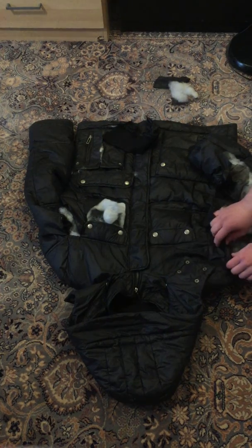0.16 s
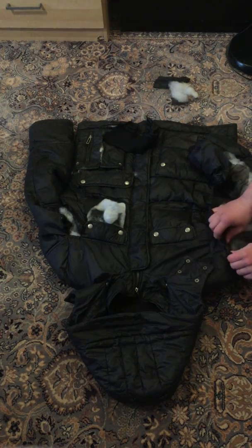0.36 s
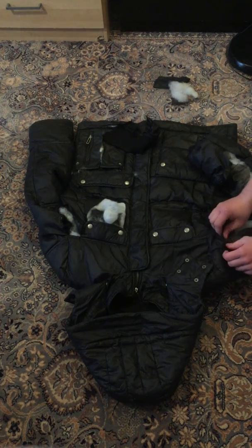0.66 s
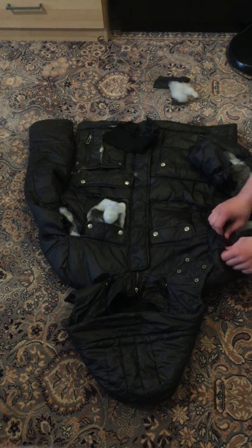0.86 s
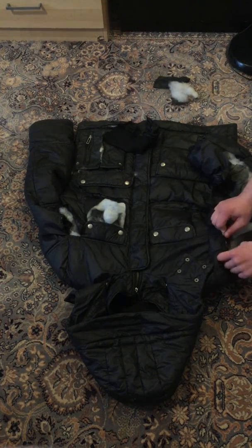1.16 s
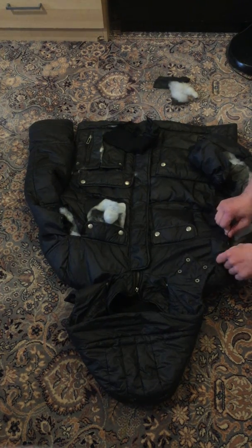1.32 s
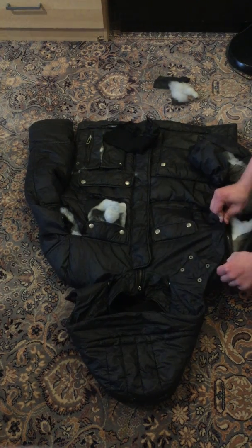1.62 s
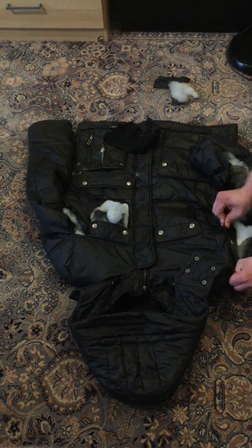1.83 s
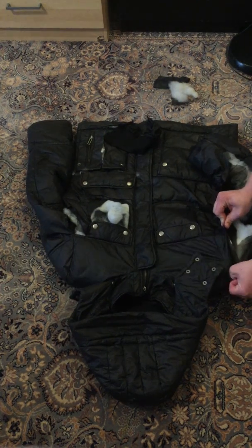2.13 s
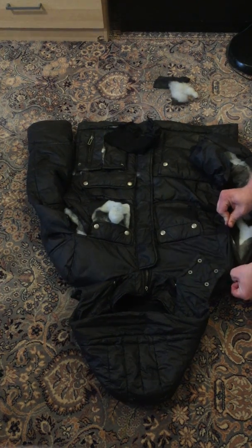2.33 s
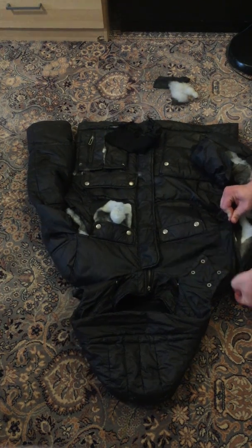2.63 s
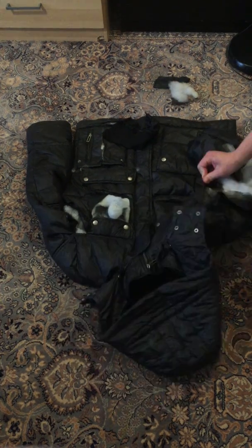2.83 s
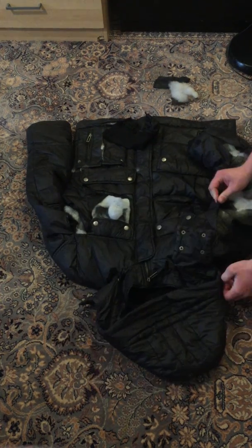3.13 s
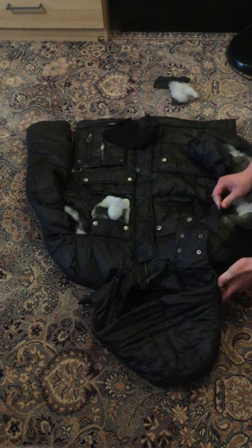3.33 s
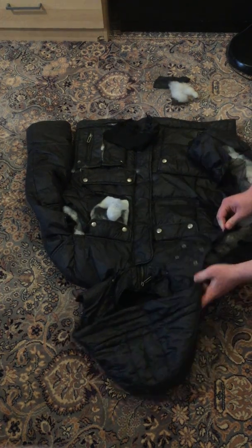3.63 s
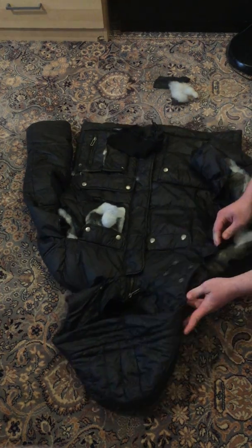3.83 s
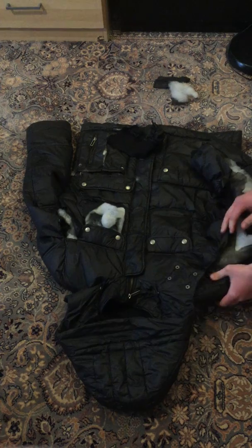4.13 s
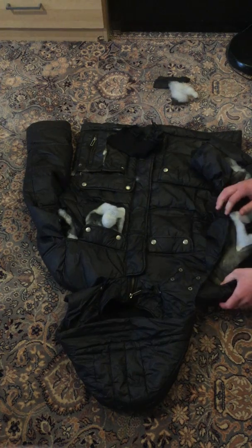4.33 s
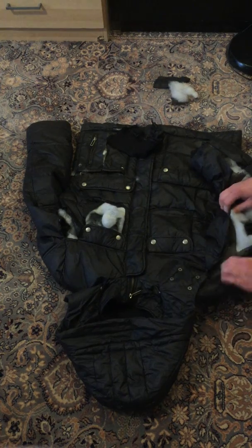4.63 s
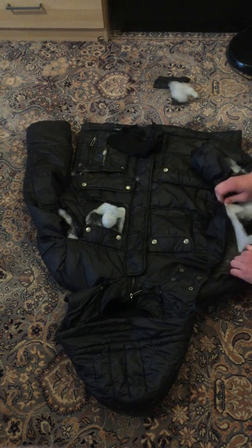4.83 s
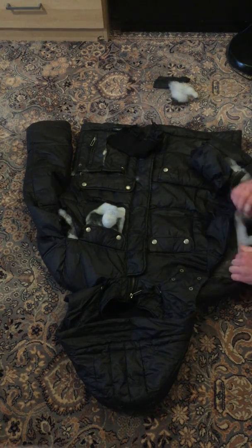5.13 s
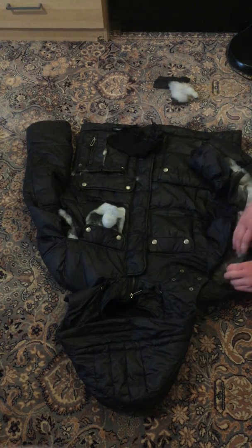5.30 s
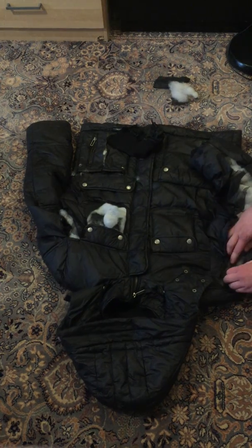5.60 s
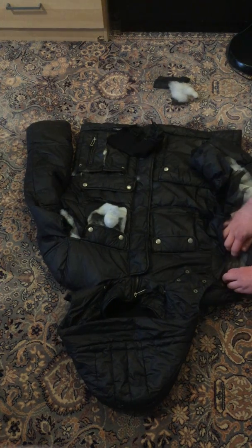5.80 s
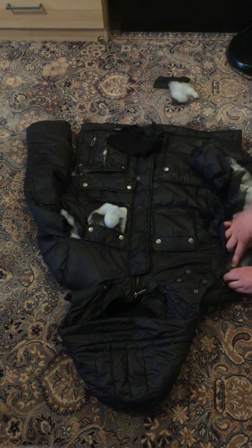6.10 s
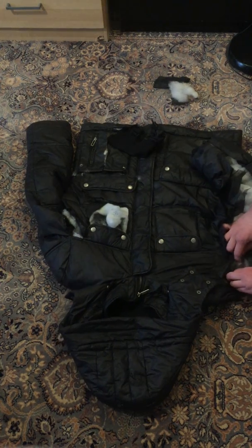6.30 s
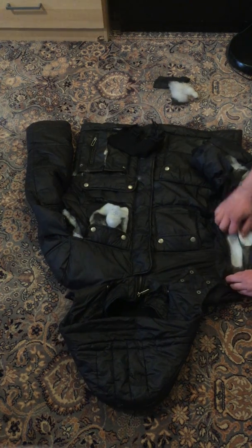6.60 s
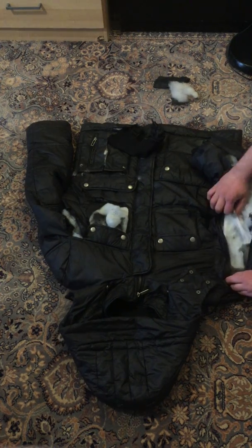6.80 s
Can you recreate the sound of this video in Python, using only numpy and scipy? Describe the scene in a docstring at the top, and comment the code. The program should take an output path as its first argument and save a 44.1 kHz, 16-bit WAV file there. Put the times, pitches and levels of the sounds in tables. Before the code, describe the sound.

After faint fumbling, jacket fabric tears loudly with snapping threads and dull padded thumps, followed by soft rustling in a quiet carpeted room.

```python
"""Hands tear the nylon shell of a quilted jacket on a carpet: threads snap singly or in dense rips.
Snaps and rips are noise bursts; jolted padded panels ring in two damped modes with a crinkle.
Between pulls, grainy noise gives fingers sliding, cloth dragging and padding shifting.
A metal fitting tinkles, low noise bumps through the floor, and a quiet room adds echoes and hiss."""
import sys
import numpy as np
from scipy import signal
from scipy.fft import rfft, irfft, next_fast_len
from scipy.io import wavfile
from scipy.ndimage import uniform_filter1d

SR = 44100
rng = np.random.default_rng(int(sys.argv[2]) if len(sys.argv) > 2 else 0)


def put_to_file(sound):
    """Save the sound as 16-bit audio at rate SR, in the file named by the first command-line argument."""
    columns = np.atleast_2d(sound).T  # one column per channel
    safe = np.clip(columns, -1, 1)
    whole_steps = np.round(safe * 32767)
    wavfile.write(sys.argv[1], SR, whole_steps.astype(np.int16))


N = 306495

# single threads breaking, loud ones and quiet isolated ones, each at a set time:
# (time [s], thread peak [dB], brightness [dB], panel crack re thread [dB])
THREAD_SNAPS = [(1.5246, -15.5, -4, -11.5), (1.5404, -22, 2, -28), (1.5842, -19, -4, -5.5),
                (1.6159, -16, 8, -3), (1.7276, -29, -14, 2), (1.7391, -35, 2, 9.5), (1.7449, -34.5, 3, 8),
                (1.7546, -25, 0, -15), (1.7623, -38, 1, -8), (1.769, -30, -11, -2), (1.8071, -36, 0, -10),
                (1.8156, -27, -4, -14), (1.8243, -27, 0, -19), (1.8284, -23, 0, -5), (1.8342, -20, 4, -11),
                (1.839, -24.5, 9, 0.5), (1.8446, -27, 2, -7), (1.85, -30, 7, -8), (1.8573, -27, 3, -6),
                (1.8752, -18, 4, -11), (1.8882, -24, -2, -9), (1.9041, -24.5, 0, -8.5),
                (1.9257, -23.5, 17, -7), (1.9406, -21, 21, -9), (1.9656, -27, 18, -21),
                (1.969, -25.5, 5, -4.5), (1.9923, -39, 2, -10), (2.0083, -38, -4, -18),
                (2.0305, -42, -2, -23), (2.0359, -33.5, -1, -14), (2.0424, -33, -2, -18),
                (2.1188, -20.5, -9, -11.5), (2.192, -39, -16, -18), (2.195, -33, -4, -11),
                (2.1995, -41, -11, -10), (2.2058, -31.5, -9, -21), (2.2083, -32, -14, -17),
                (2.239, -46, -5, -6), (2.2782, -39, 0, -24), (2.2826, -44, 3, -3), (2.2898, -14, -7, -23.5),
                (2.3692, -47, 5, -17), (2.373, -41.5, 9, -21), (2.442, -41, 3, -16), (2.4502, -40, -4, -14),
                (2.4545, -37, -6, -13), (2.4721, -33, -9, -21), (2.4765, -18, -5, -35),
                (2.4784, -20, -1, -18), (2.4828, -18.5, 1, -25), (2.488, -29, -7, -7),
                (2.4915, -25, -1, -14), (2.5391, -44, 8, -14), (2.7031, -34.5, -9, -4),
                (2.7072, -31, -6, -15), (2.709, -20, -10, -24), (2.712, -19.5, -4, -3),
                (2.7212, -14.5, -3, -30), (2.7252, -17.5, -5, -6), (2.7346, -25, 9, 0),
                (2.7488, -22, 9, -11), (6.4112, -44, 5, 1.5), (6.6026, -47, -6, -16), (6.65, -51, 0, 10.5),
                (6.6895, -51.5, 0, 10), (6.793, -58, 0, 8)]
# further threads giving way at random moments as the seam frays:
# (start [s], length [s], mid-range peak [dB])
FRAYING_SPANS = [(1.73, 0.076, -41), (1.805, 0.095, -31), (1.9, .08, -37), (2.028, 0.018, -42.5)]
FRAY_PER_S, FRAY_RANGE_DB = 70, 9  # range is plus or minus
FRAY_BRIGHT_DB, FRAY_CRACK_DB = -1, -11.5
# runs of dense tearing, each a curve: (time [s], threads [dB], panel [dB], padding [dB])
RIP_CURVES = [
    [(1.523, -56, -63, -66), (1.54, -38, -43.5, -64), (1.575, -35, -44, -54), (1.59, -35, -32, -49),
     (1.62, -30, -32.5, -33.5), (1.645, -34.5, -29, -51), (1.68, -45.5, -41.5, -53), (1.72, -53, -46, -63)],
    [(1.725, -48, -50, -57), (1.765, -56, -37.5, -54), (1.8, -53, -44, -65), (1.83, -46, -43, -44),
     (1.86, -56, -51, -56), (1.88, -41.5, -43.5, -55.5), (1.92, -62, -50, -56.5), (1.97, -53, -47.5, -57),
     (2.02, -63, -64, -63), (2.06, -52, -62, -61)],
    [(2.474, -49.5, -44, -44), (2.505, -50.5, -54.5, -54.5), (2.54, -54.5, -72, -65),
     (2.575, -74, -82, -78)],
    [(2.707, -54, -56, -55), (2.718, -48, -37, -42), (2.73, -32, -34, -38.5), (2.755, -38, -38.5, -49),
     (2.775, -38.5, -41, -34), (2.79, -59, -41, -54), (2.82, -53.5, -62, -50)],
]
# padded panel jolted:
# (time [s], low mode [dB], tautness [pitch factor], high mode re low [dB], crinkle re low [dB])
PANEL_JOLTS = [(1.524, -43, 1, -12, 5), (1.583, -35.5, 0.97, 10, 1), (1.6142, -23.5, 0.88, 7.5, -5),
               (1.847, -37.5, 1.06, -1, -6), (1.876, -32, 0.93, -19, -7), (1.941, -34, 1.03, -17, -12),
               (1.97, -30, 1.04, -12, -20), (2.036, -46.5, 1, -13, -10), (2.118, -39, 1.02, -8, -21),
               (2.29, -32.5, 0.98, 8.5, -4), (2.477, -38.5, 0.91, 12.5, -15), (2.712, -35.5, 0.93, 6, 1),
               (2.722, -24.5, 0.9, 2.5, 3.5), (2.769, -26.5, 0.74, -12, -18), (3.043, -48, 0.94, -13, -14),
               (3.645, -54, 1.02, 6, 1), (4.887, -64, 0.95, 0, 10.5), (4.92, -67, 1, 4, 9),
               (6.365, -48.5, 1.07, -18, -15), (6.4096, -30, 0.95, -17, -9.5), (6.446, -42, 0.66, -11, -24),
               (6.568, -58, 0.85, 1, 1), (6.603, -49.5, 0.82, -12, -5), (6.651, -42, 1.02, 5.5, -7),
               (6.689, -42, 1.08, 6, -2), (6.79, -48, 1.08, 13, -4)]
# low and high mode of a padded panel: (frequency [Hz], t60 [s])
PANEL_MODES = [(350, 0.03), (635, 0.015)]
# hand moves: (peak [s], rise [s], fall [s], fingers sliding [dB], sheen re sliding [dB],
#              cloth dragging [dB], padding shifting [dB])
HAND_STROKES = [(0.0, .01, 0.036, -69, -14, -63, -61), (.212, 0.15, 0.12, -71, -3, -68.5, -79),
                (.284, 0.069, .05, -80, -5, -76, -63), (.354, 0.067, 0.13, -72.5, -9, -73, -77),
                (.538, .05, 0.068, -68, -6, -71.5, -78), (.93, .025, 0.063, -78, 0, -78, -75),
                (1.08, .06, 0.048, -70.5, 6, -71.5, -75), (1.25, 0.09, .04, -70.5, 4, -73.5, -79),
                (1.31, .015, .12, -69.5, -4, -68.5, -74), (1.43, .05, 0.12, -75, -4, -76, -82),
                (1.501, 0.044, 0.02, -66, -2, -67, -94), (2.8, 0.0088, 0.094, -51, -7, -45, -48),
                (2.93, 0.077, 0.077, -75, -4, -59.5, -61), (3.034, 0.025, 0.082, -73, -4, -59, -62),
                (3.16, 0.057, 0.13, -68.5, -4, -64.5, -85), (3.26, .1, 0.043, -69.5, 0, -69, -75),
                (3.4, 0.17, .2, -81, -8, -67, -82), (3.65, .17, 0.2, -70, -4, -62.5, -68),
                (3.81, 0.082, 0.16, -67.5, -2, -54.5, -63), (3.91, .12, 0.1, -68.5, -4, -55, -64.5),
                (4.03, .06, 0.077, -76, -5, -69.5, -70), (4.21, 0.12, .05, -72.5, 5, -72, -77),
                (4.25, 0.039, 0.21, -78, -1, -68, -68.5), (4.45, 0.26, 0.074, -71.5, -3, -72.5, -76),
                (4.66, 0.11, .15, -69, 0, -76, -77.5), (4.8, 0.25, 0.13, -66.5, 3, -68, -77),
                (4.9, 0.1, 0.13, -74, 0, -68.5, -73), (5.05, .05, 0.06, -73, -7, -86, -76),
                (5.125, 0.041, 0.027, -64.5, -15, -73, -79), (5.27, 0.071, 0.21, -73.5, 2, -76.5, -90),
                (5.45, 0.11, 0.13, -77.5, -5, -75.5, -78), (5.75, 0.21, .09, -76, -3, -67.5, -72),
                (5.86, 0.081, .13, -68.5, -10, -69, -70.5), (6.04, .04, 0.074, -77, -19, -76, -72),
                (6.25, 0.28, 0.14, -82, 2, -76, -76), (6.395, 0.094, 0.042, -74, 0, -65, -62),
                (6.43, 0.011, 0.024, -76, -5, -66, -56.5), (6.47, .03, 0.059, -73, 4, -76, -79),
                (6.569, 0.0044, .04, -65, 1, -61, -70), (6.62, 0.055, 0.072, -60.5, -1, -63.5, -72),
                (6.73, 0.11, 0.15, -54, -2.5, -54.5, -56.5), (6.81, 0.062, 0.034, -61, 0, -61, -59.5),
                (6.93, .06, 0.07, -77, -0.5, -76, -89)]
EDGE_DB, ROUNDNESS = -15.5, 1.41  # a swell is EDGE_DB down one rise before and one fall after its peak
# metal fitting struck: (time [s], level [dB])
FITTING_TINKS = [(2.955, -64), (3.02, -63)]
# modes of the fitting: (frequency [Hz], level [dB], t60 [s])
FITTING_MODES = [(10030, 0, 0.085), (15700, 0, .06)]
# dull bump through the floor, upper band then deep band twice: (peak [s], rise [s], fall [s], level [dB])
BUMP_SWELLS = [(.62, 0.045, 0.14, -46), (.675, 0.11, 0.065, -50.5), (.8, 0.045, .05, -57.5)]
# upper and deep spectrum of the bump: (frequency [Hz], density [dB per Hz])
BUMP_SPECTRA = [
    [(90, -15), (150, 4.5), (290, -0.5), (340, -15), (900, -48)],
    [(30, -17), (50, 7), (110, 7), (170, -25), (400, -58)],
]

# spectrum of a snapping thread: (frequency [Hz], density [dB per Hz])
THREAD_SPECTRUM = [(1800, -14), (2800, -8.5), (4000, -2), (6000, 1), (8000, -0.5), (10500, 0.5),
                   (14000, -3.5), (17500, -2)]
# spectrum of threads in a dense rip: (frequency [Hz], density [dB per Hz])
TEAR_SPECTRUM = [(2500, -11.5), (4000, -8), (6000, 2), (8000, -9.5), (10500, -1.5), (14000, -8),
                 (17500, -0.5)]
# spectrum of the cracking panel: (frequency [Hz], density [dB per Hz])
PANEL_SPECTRUM = [(200, -38), (600, -4.5), (1000, -8.5), (1700, 1), (2500, 0), (3500, -5), (6000, -10.5)]
# spectrum of the filling: (frequency [Hz], density [dB per Hz])
PADDING_SPECTRUM = [(70, -30), (130, -6), (250, -1.5), (350, 1.5), (450, -4), (630, 0.5), (900, -5.5),
                    (1400, -31)]
# spectrum of the crinkling shell: (frequency [Hz], density [dB per Hz])
CRINKLE_SPECTRUM = [(400, -30), (800, -4), (1800, 7.5), (3000, -9), (5000, -6)]
# spectrum of fingers on nylon: (frequency [Hz], density [dB per Hz])
SLIDE_SPECTRUM = [(1500, -26), (4000, 5), (6500, 6.5), (10000, -1), (12500, -6)]
# top treble of that friction: (frequency [Hz], density [dB per Hz])
SHEEN_SPECTRUM = [(8000, -20.5), (11000, -2), (14000, -9), (17500, -3)]
# spectrum of cloth on carpet: (frequency [Hz], density [dB per Hz])
DRAG_SPECTRUM = [(500, -3), (900, -2), (1800, 4.5), (2600, 0.5), (4000, -6.5), (7000, -31)]
# a small panel moves no deep bass: (frequency [Hz], gain [dB])
NO_BASS_GAIN = [(40, -25), (95, -0.5)]

# nearby surfaces: (delay [s], level [dB])
ROOM_ECHOES = [(.0066, -10), (0.0114, -16.5), (0.0224, -19)]
# decay of the diffuse tail: (frequency [Hz], t60 [s])
ROOM_T60 = [(200, 0.44), (600, 0.35), (1500, 0.34), (4000, 0.31), (10000, 0.16), (16000, 0.18)]
# what a reflection keeps: (frequency [Hz], gain [dB])
WALL_GAIN = [(300, -8.5), (1000, 1.5), (6500, -1), (8000, -3.5), (16000, -4)]
ROOM_DB = -7.5
# spectrum of air and microphone hiss: (frequency [Hz], density [dB per Hz])
HISS_SPECTRUM = [(34, -18), (46, 8.5), (60, -5.5), (78, -4), (90, 4), (105, -2.5), (180, -10), (270, -7.5),
                 (430, -11), (1080, -15.5), (2300, -15.5), (6000, -20.5), (10300, -23.5), (17000, -28.5)]
HISS_DB = -68
# dip of the microphone housing: (frequency [Hz], gain [dB])
MIC_GAIN = [(9700, 0), (10600, -7), (11500, 0)]
BASS_CUT_HZ, EDGE_HZ = 38, 17250


def snaps():
    """A break is a spike in a millisecond burst: thread in the treble, panel cracking below."""
    rows = THREAD_SNAPS + frayed()
    out, t = np.zeros(N), np.arange(-120, 400) / SR
    shape = np.where(t < 0, np.exp(t / 0.0003), np.exp(-t / 0.00045))
    noises = rng.standard_normal((len(rows), 2, len(t)))
    for (s, db, bright_db, crack_db), (thread_noise, crack_noise) in zip(rows, noises):
        tilt = [(6000, -bright_db * 0.6), (12000, bright_db * 0.6)]
        spike = 3.3 * np.sign(thread_noise) * (t == 0)
        thread = colour(colour(thread_noise * shape + spike, THREAD_SPECTRUM), tilt)
        # the smaller exponent lengthens the crack
        crack = colour(crack_noise * shape ** 0.34 + spike, PANEL_SPECTRUM)
        add(out, s + t[0], amp(db) * (unit_peak(thread) + amp(crack_db) * unit_peak(crack)))
    return out


def frayed():
    """Thread breaks at random moments in each fraying span, as rows like THREAD_SNAPS."""
    rows = []
    for start_s, length_s, mid_db in FRAYING_SPANS:
        count = int(FRAY_PER_S * length_s) + 1
        for when, level, bright, crack in rng.random((count, 4)):
            rows.append((start_s + length_s * when,
                         mid_db + FRAY_RANGE_DB * (2 * level - 1),
                         FRAY_BRIGHT_DB + 12 * (bright - 0.5),
                         FRAY_CRACK_DB + 12 * (crack - 0.5)))
    return rows


def rips():
    """Thousands of thread breaks a second shake the panel and the padding under it."""
    out = np.zeros(N)
    for rows in RIP_CURVES:
        s, (thread_db, panel_db, padding_db) = columns(rows)
        per_s = 3500 * amp(0.3 * (thread_db + 49.5))  # a harder pull breaks more threads
        breaks = grains(per_s, spread_db=2.0, grain_s=0.00029)
        slack = grains(0.4 * per_s, spread_db=7.0, grain_s=0.0026)
        sound = amp(thread_db) * evened(colour(breaks, TEAR_SPECTRUM))
        sound += amp(panel_db) * evened(colour(breaks, PANEL_SPECTRUM))
        sound += amp(padding_db) * evened(colour(slack, PADDING_SPECTRUM))
        add(out, s, sound * signal.windows.tukey(len(sound), 0.04))
    return out


def jolts():
    """Two heavily damped low modes with a soft start, and a crinkle of the shell dying with them."""
    out, t = np.zeros(N), np.arange(4000) / SR
    (low_hz, low_t60_s), (high_hz, high_t60_s) = PANEL_MODES
    soft_start = 1 - np.exp(-t / 0.00077)
    noises = rng.standard_normal((len(PANEL_JOLTS), len(t)))
    for (s, db, taut, high_db, crinkle_db), noise in zip(PANEL_JOLTS, noises):
        ring = amp(-60 * t / low_t60_s) * np.sin(2 * np.pi * low_hz * taut * t)
        ring += amp(high_db - 60 * t / high_t60_s) * np.sin(2 * np.pi * high_hz * taut * t)
        ring += amp(crinkle_db - 60 * t / 0.034) * evened(colour(noise, CRINKLE_SPECTRUM))
        add(out, s, amp(db) * soft_start * ring)
    return out


def handling():
    """Fine friction hiss of fingertips, coarser scuff of cloth, soft shifting of the filling."""
    frames_s = np.arange(0, N + 64, 64) / SR
    power = np.zeros((4, len(frames_s)))
    for s, rise_s, fall_s, slide_db, sheen_db, drag_db, padding_db in HAND_STROKES:
        peaks_db = [slide_db, slide_db + sheen_db, drag_db, padding_db]
        power += amp(np.add.outer(peaks_db, swell(frames_s, s, rise_s, fall_s))) ** 2
    gains = [np.interp(np.arange(N) / SR, frames_s, np.sqrt(p)) for p in power]
    steady = np.ones(N)
    rub = grains(7000 * steady, spread_db=-4.0, grain_s=0.0013)
    scuff = grains(1000 * steady, spread_db=3.0, grain_s=0.0019)
    shift = grains(600 * steady, spread_db=-0.5, grain_s=0.006)
    layers = [colour(rub, SLIDE_SPECTRUM), colour(rub, SHEEN_SPECTRUM),
              colour(scuff, DRAG_SPECTRUM), colour(shift, PADDING_SPECTRUM)]
    return sum(gain * evened(layer) for gain, layer in zip(gains, layers))


def tinks():
    """Two high decaying modes of a small piece of metal."""
    out, t = np.zeros(N), np.arange(6000) / SR
    ring = sum(amp(db - 60 * t / t60_s) * np.sin(2 * np.pi * hz * t) for hz, db, t60_s in FITTING_MODES)
    for s, db in FITTING_TINKS:
        add(out, s, amp(db) * ring)
    return out


def bump():
    """Low noise in two bands; the deeper one comes later and rolls once more."""
    out, t = np.zeros(N), np.arange(N) / SR
    upper, deep = BUMP_SPECTRA
    for (s, rise_s, fall_s, db), band in zip(BUMP_SWELLS, [upper, deep, deep]):
        noise = evened(colour(rng.standard_normal(N), band))
        out += amp(db + swell(t, s, rise_s, fall_s)) * noise
    return out


def room(x):
    """A few single echoes, and a diffuse tail in which each band dies at its own speed."""
    hz, t, z = signal.stft(rng.standard_normal(SR // 2), SR, nperseg=256)
    decay = amp(-60 * t / read(ROOM_T60, hz)[:, None])
    tail = signal.istft(z * decay, SR, nperseg=256)[1]
    tail = tail * np.clip((np.arange(len(tail)) / SR - 0.0015) / 0.0031, 0, 1)
    tail = amp(ROOM_DB) * tail / np.linalg.norm(tail)
    # soft surfaces spread each echo, from 1 ms ahead of its delay
    smear = rng.standard_normal((len(ROOM_ECHOES), 130)) * np.hanning(130)
    for (s, db), patch in zip(ROOM_ECHOES, smear):
        add(tail, s - 0.001, amp(db) * patch / np.linalg.norm(patch))
    return signal.fftconvolve(colour(x, WALL_GAIN), tail)[:N]


def hiss():
    """Steady coloured noise of air and microphone."""
    return amp(HISS_DB) * evened(colour(rng.standard_normal(N), HISS_SPECTRUM))


def grains(per_s, spread_db, grain_s):
    """Noise chopped into decaying bursts at random moments; sizes spread exponentially in dB."""
    size = amp(spread_db * np.minimum(rng.exponential(1, len(per_s)), 4))
    starts = size * (rng.random(len(per_s)) < per_s / SR)
    burst = np.exp(-np.arange(600) / (SR * grain_s))
    x = rng.standard_normal(len(per_s)) * signal.oaconvolve(starts, burst)[:len(per_s)]
    return x / np.sqrt(per_s / per_s.mean())  # density leaves the level alone


def swell(t, s, rise_s, fall_s):
    """Level in dB of a rounded rise and fall around second s."""
    return EDGE_DB * np.where(t < s, (s - t) / rise_s, (t - s) / fall_s) ** ROUNDNESS


def amp(db):
    """Gain of a level in dB."""
    return 10 ** (np.asarray(db, float) / 20)


def evened(x):
    """Scales to rms 1."""
    return x / np.sqrt(np.mean(x ** 2) + 1e-20)


def unit_peak(x):
    """Scales a burst so that its envelope over half a millisecond peaks at 1."""
    return x / np.sqrt(2 * uniform_filter1d(x ** 2, size=22).max())


def read(points, hz):
    """Table value at the given frequencies, interpolated over log frequency."""
    f, value = np.transpose(points)
    return np.interp(np.log(hz + 1), np.log(f + 1), value)


def colour(x, points):
    """Filters a signal by a table of dB over frequency."""
    size = next_fast_len(len(x) + 4096)
    gain = amp(read(points, np.fft.rfftfreq(size, 1 / SR)))
    return irfft(rfft(x, size) * gain, size)[:len(x)]


def columns(rows):
    """Start time and every column of a curve, sample by sample."""
    s, *values = np.transpose(rows)
    t = np.arange(s[0], s[-1], 1 / SR)
    return s[0], [np.interp(t, s, v) for v in values]


def add(mix, s, sound):
    """Mixes a sound in at second s."""
    part = mix[round(s * SR):][:len(sound)]
    part += sound[:len(part)]


def scene():
    """Cloth and fitting share the room; bump and hiss are added without it."""
    close = colour(snaps() + rips() + jolts() + handling() + tinks(), NO_BASS_GAIN)
    return (close + room(close) + bump() + hiss())[None]


def record(dry):
    """Colour and bass roll-off of the microphone, then the band limit."""
    bass_cut = signal.butter(6, BASS_CUT_HZ, "high", fs=SR, output="sos")
    thin = signal.sosfilt(bass_cut, colour(dry[0], MIC_GAIN))[None]
    band_limit = signal.firwin(301, EDGE_HZ, window=("kaiser", 6), fs=SR)[None]
    return signal.oaconvolve(thin, band_limit, "same")


dry = scene()
out = record(dry)
put_to_file(out)
```